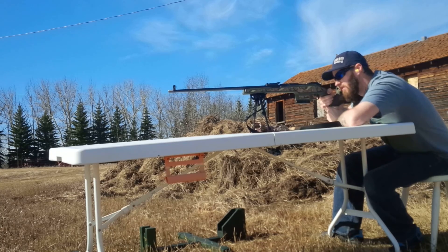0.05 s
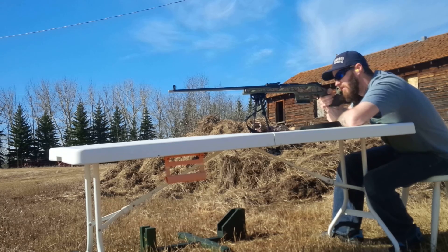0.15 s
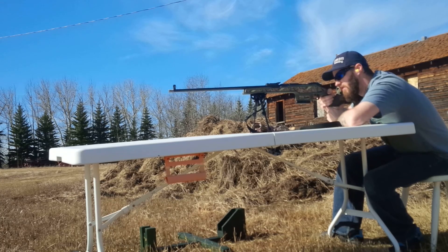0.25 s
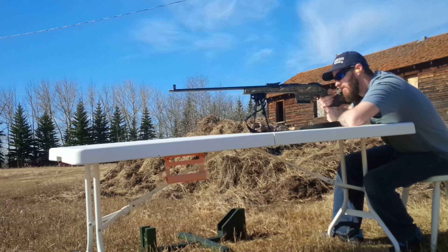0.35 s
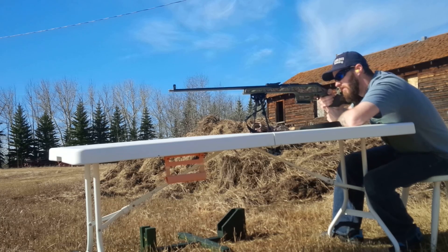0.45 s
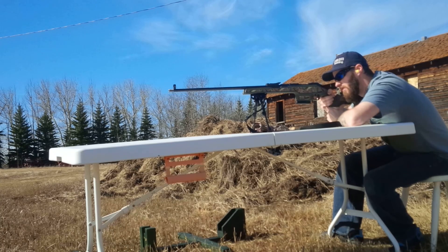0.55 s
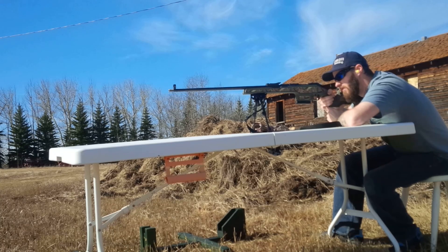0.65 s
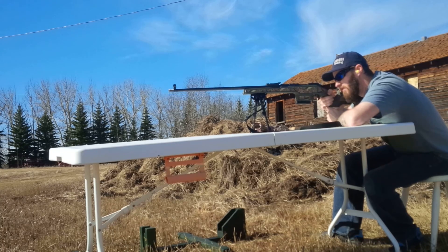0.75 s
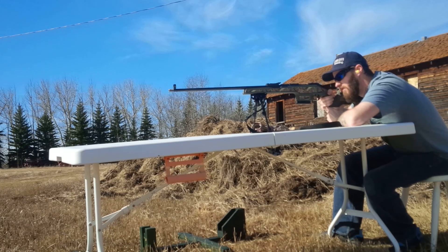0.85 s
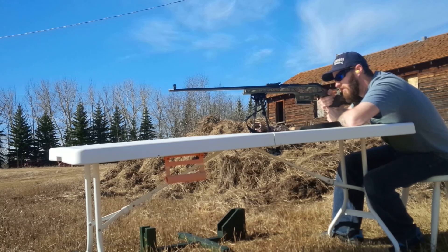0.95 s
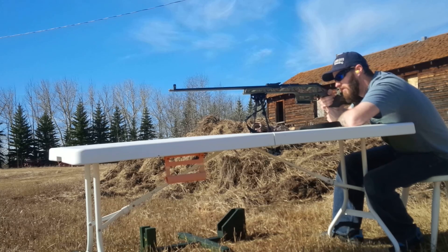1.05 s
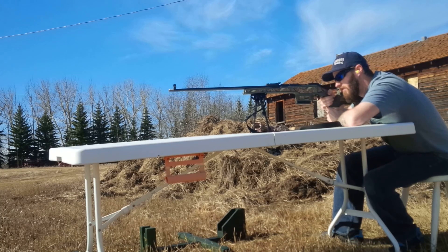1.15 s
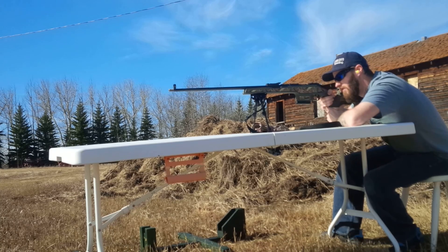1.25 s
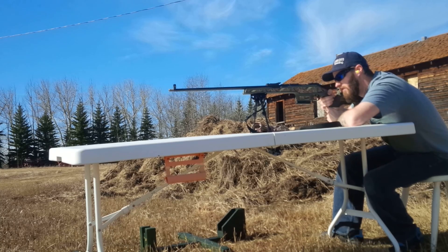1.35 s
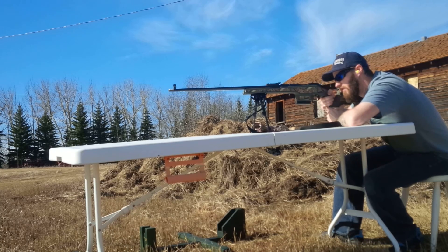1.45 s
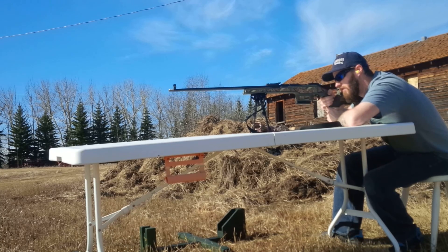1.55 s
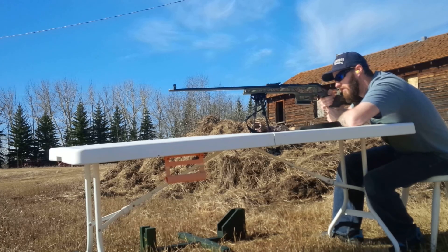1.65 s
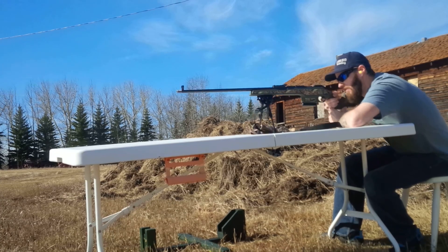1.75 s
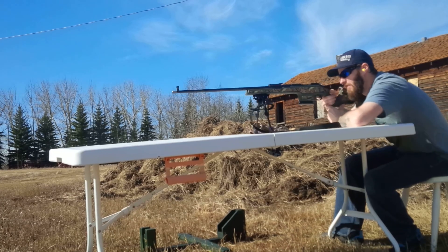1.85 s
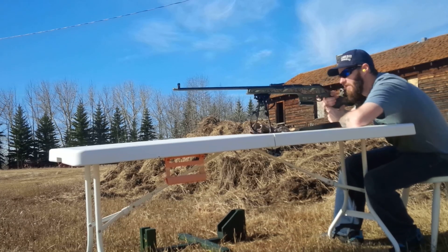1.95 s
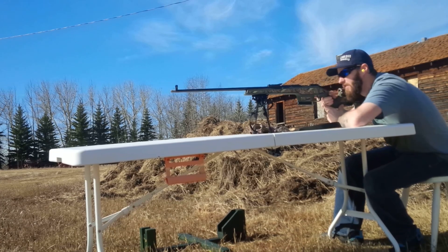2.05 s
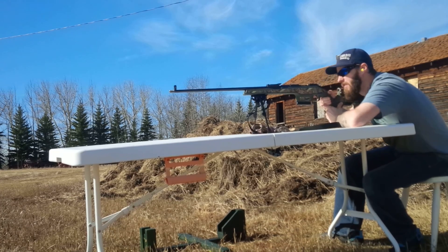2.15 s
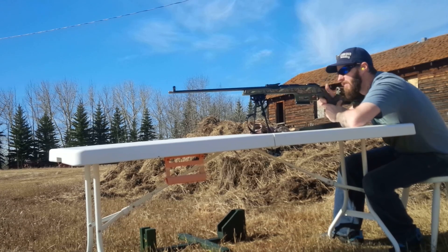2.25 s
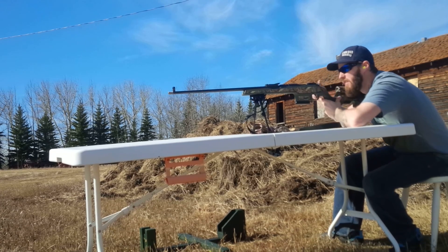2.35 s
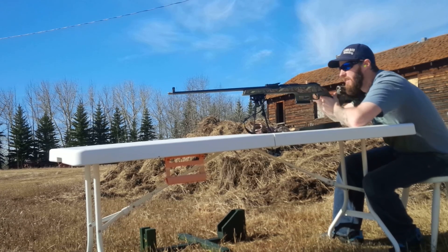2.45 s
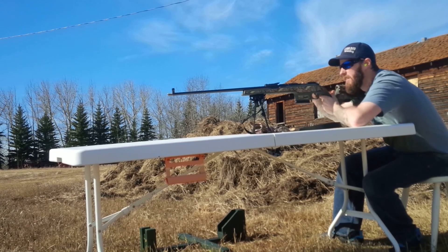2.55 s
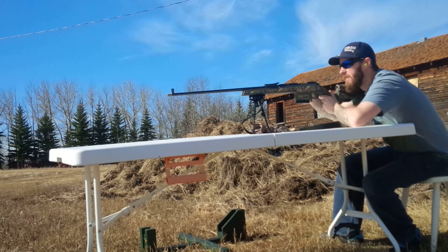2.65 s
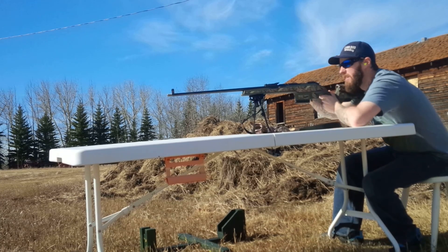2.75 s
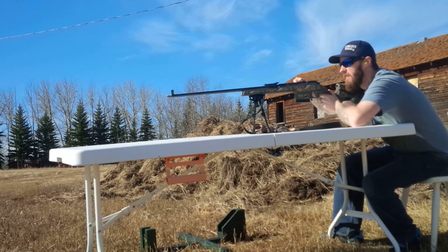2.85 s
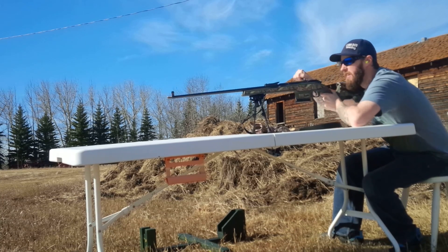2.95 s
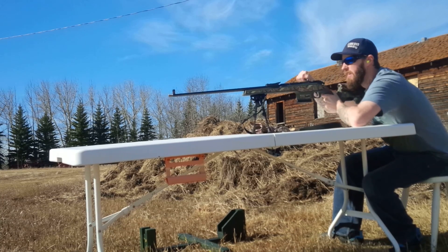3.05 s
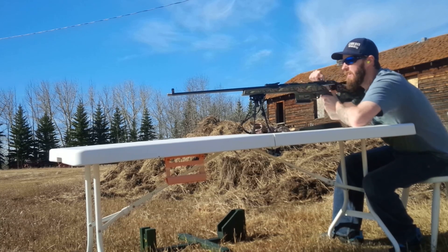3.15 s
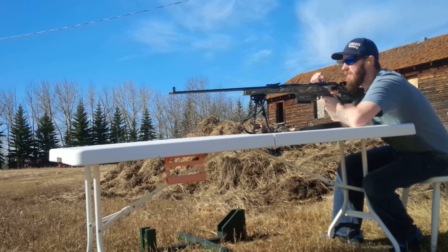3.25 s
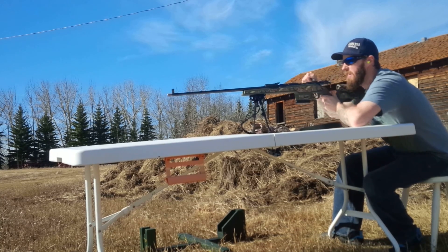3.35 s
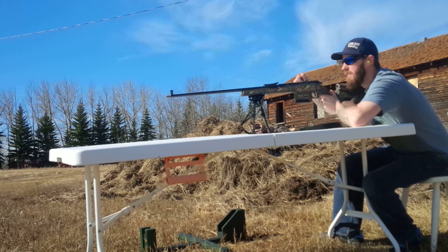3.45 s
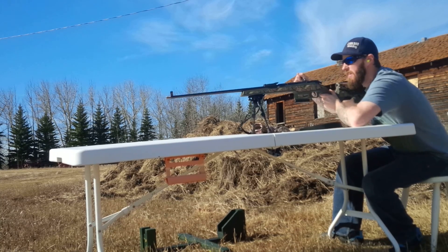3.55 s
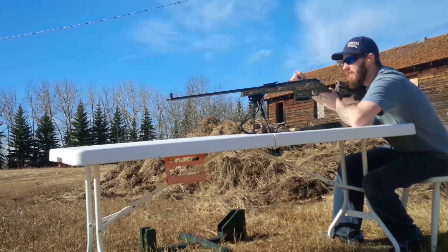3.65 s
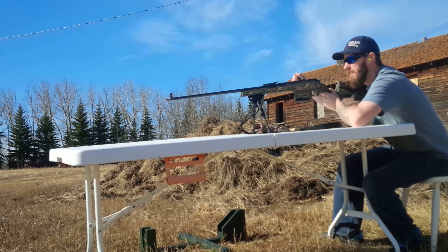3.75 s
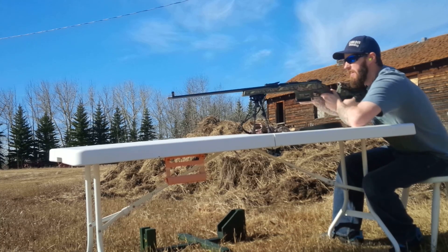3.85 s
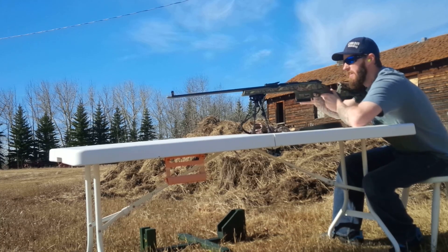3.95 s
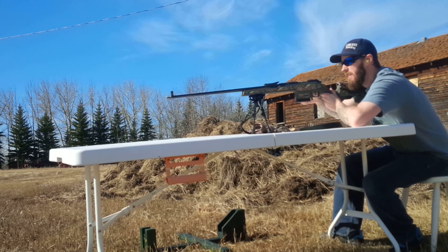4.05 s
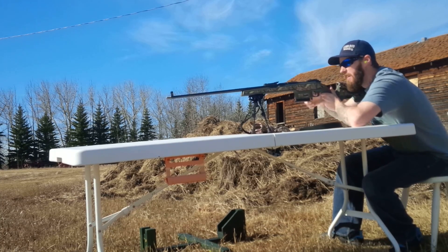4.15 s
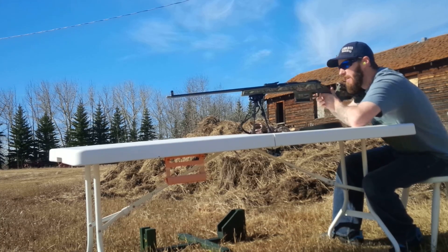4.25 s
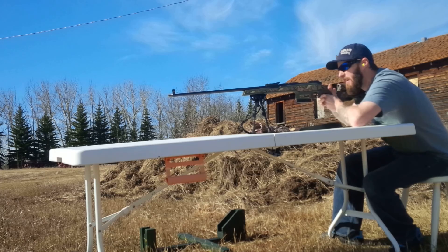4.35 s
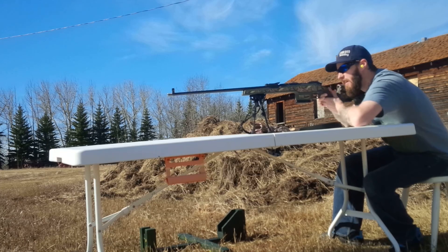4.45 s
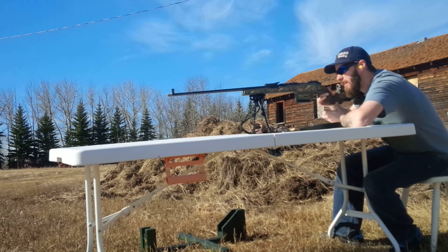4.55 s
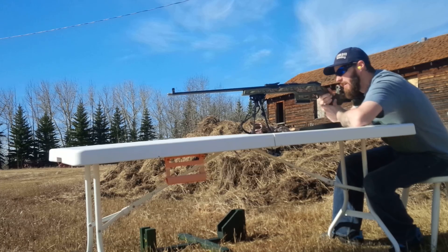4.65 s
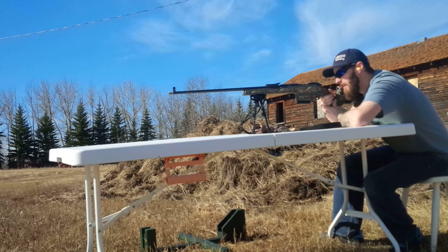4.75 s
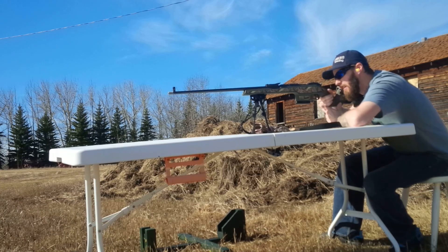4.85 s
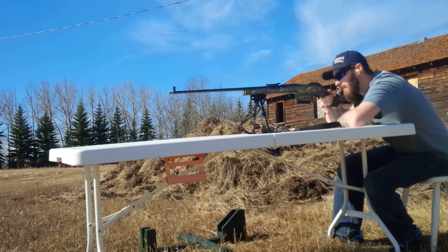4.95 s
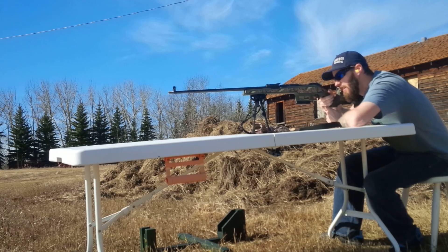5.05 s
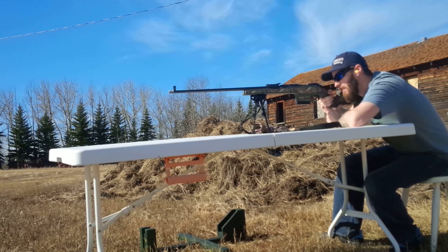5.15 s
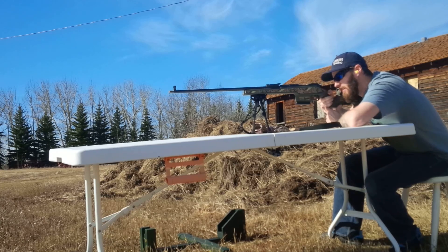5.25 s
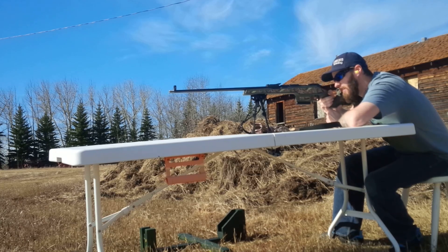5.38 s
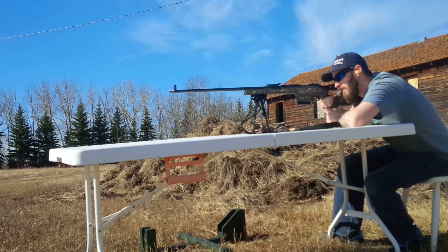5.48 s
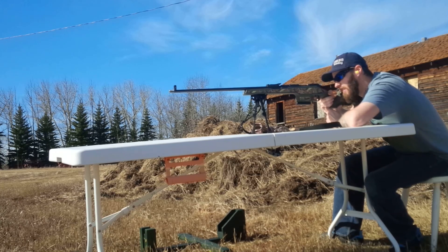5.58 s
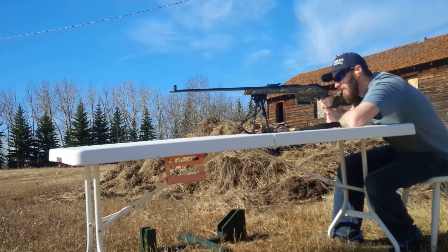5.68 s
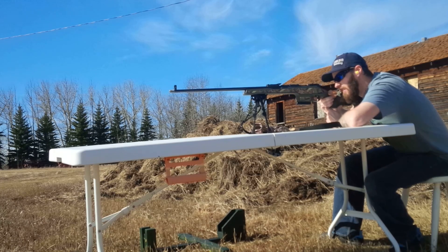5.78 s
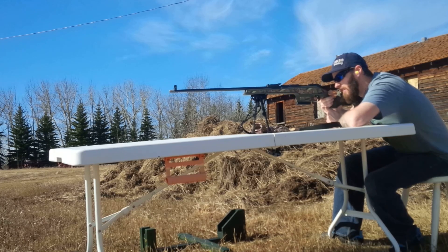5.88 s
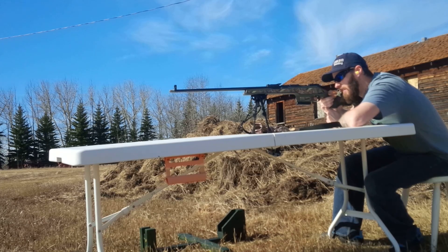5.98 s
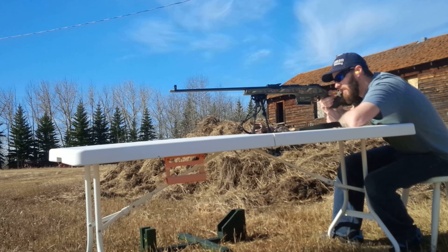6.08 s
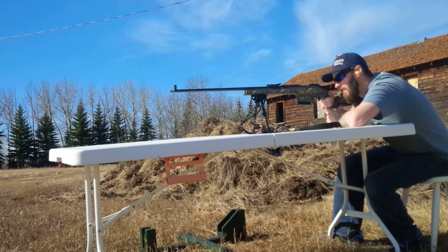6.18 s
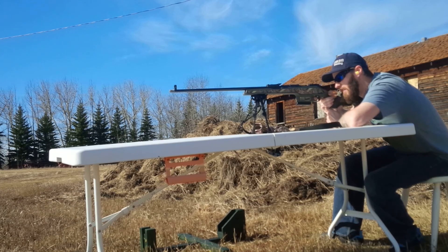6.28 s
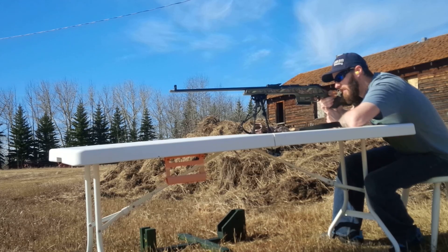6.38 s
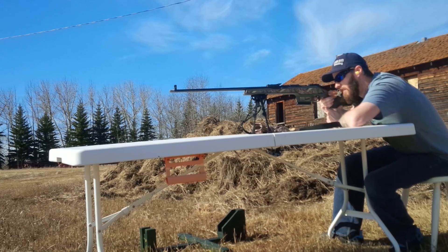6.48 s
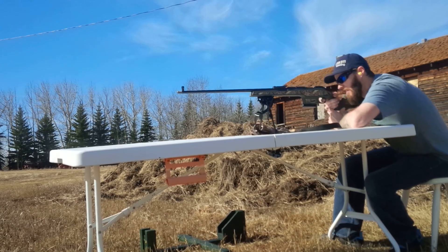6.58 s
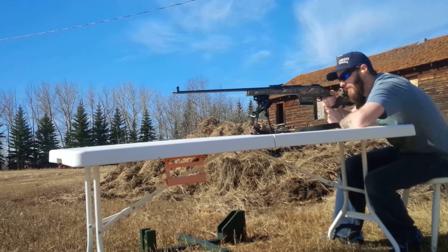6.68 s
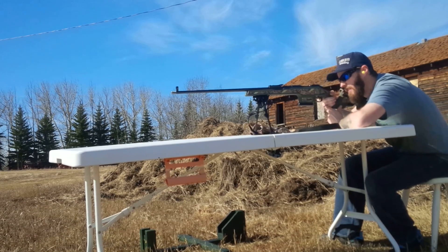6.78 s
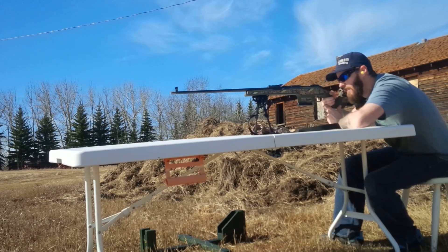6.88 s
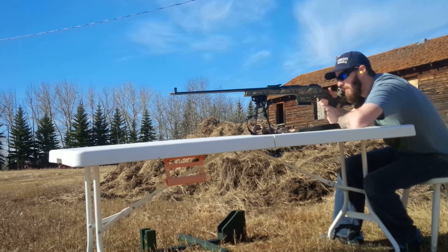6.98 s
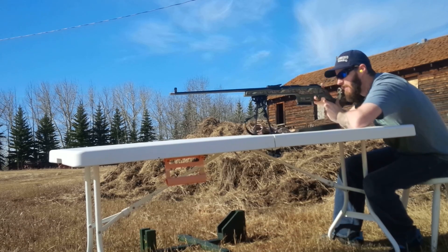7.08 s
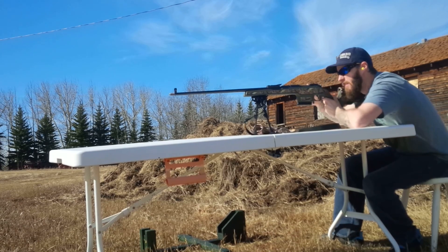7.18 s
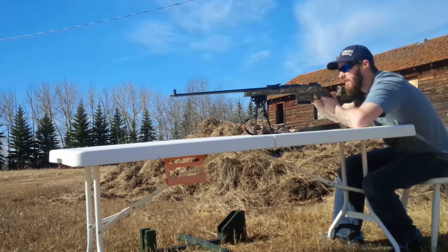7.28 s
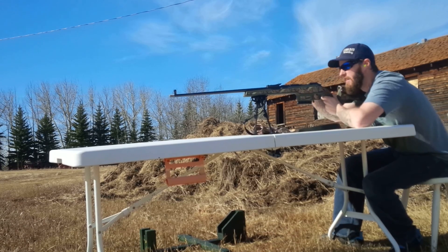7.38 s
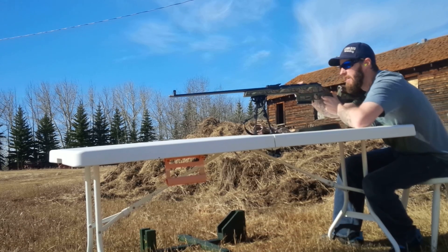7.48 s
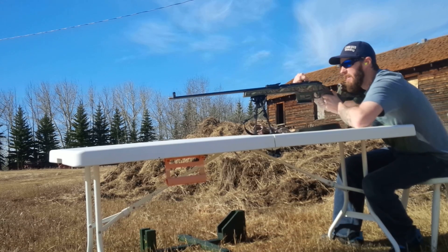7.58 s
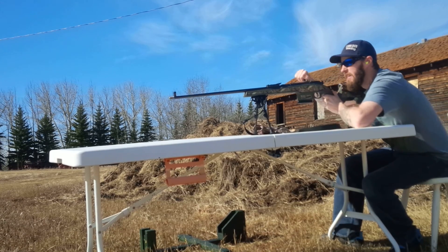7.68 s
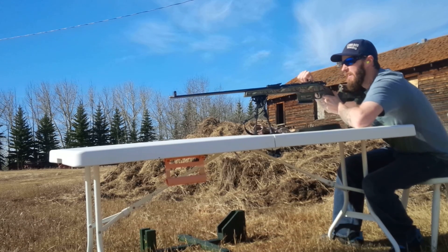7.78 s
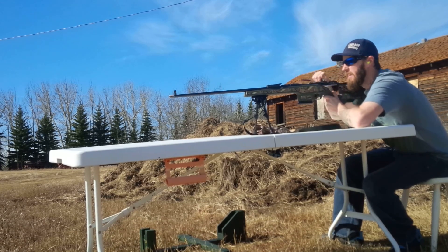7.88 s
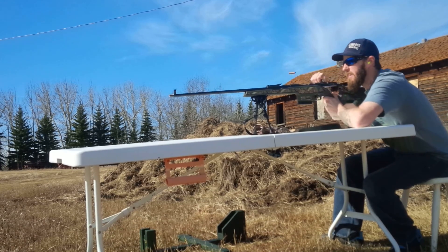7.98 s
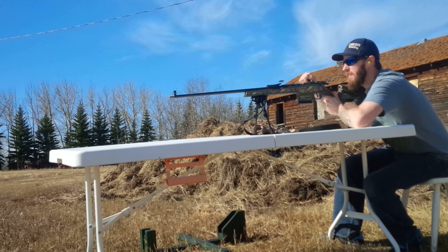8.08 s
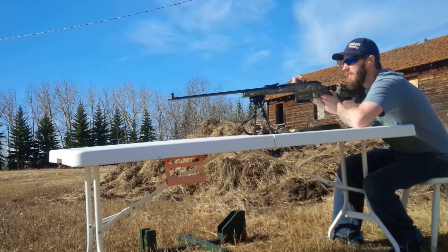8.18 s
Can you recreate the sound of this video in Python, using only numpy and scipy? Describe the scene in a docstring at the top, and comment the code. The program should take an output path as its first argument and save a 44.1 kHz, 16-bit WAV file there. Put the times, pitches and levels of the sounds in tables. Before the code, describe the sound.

In a quiet breezy field a rifle fires with a rolling echo, its bolt clacks through a cycle, then it fires and is worked again.

```python
"""Light wind and a far road lie over an open field: coloured noise with slow swells, and one car passing.
A rifle on a table a few steps from the microphone fires: a saturated noise blast and decaying ground wash.
Walls answer with slaps, and trees with a rolling tail of noise; amid it the bullet smacks down far downrange.
The bolt is lifted and drawn, the case pings out, and the bolt slides home: rough noise bursts ring steel.
The rifle fires once more, the same field answers, and the bolt is worked again."""
import sys
import numpy as np
from scipy import signal
from scipy.fft import irfft
from scipy.io import wavfile
from scipy.ndimage import uniform_filter1d

SR = 44100
rng = np.random.default_rng(int(sys.argv[2]) if len(sys.argv) > 2 else 0)


def put_to_file(sound):
    """Save the sound as 16-bit audio at rate SR, in the file named by the first command-line argument."""
    columns = np.atleast_2d(sound).T  # one column per channel
    safe = np.clip(columns, -1, 1)
    whole_steps = np.round(safe * 32767)
    wavfile.write(sys.argv[1], SR, whole_steps.astype(np.int16))


N = 362452

# Noise spectra. Each row: frequency in Hz, relative level in dB per Hz.
AIR_SPECTRUM = [(12, -31.5), (20, -10), (53, -6.5), (172, -11.5), (216, -10.5), (255, -15), (347, -14.5),
                (377, -19), (642, -19), (873, -14), (1610, -21), (1910, -25.5), (2460, -37), (13500, -52),
                (16000, -65)]  # still air over the field
ROAD_SPECTRUM = [(100, -26), (450, -14), (750, -5.5), (930, 1.5), (1100, -3.5), (1400, -7.5), (2000, -19.5),
                 (3500, -47), (16000, -70.5)]  # the far road
WIND_SPECTRUM = [(15, -4), (45, -0.5), (100, -10), (250, -35), (2000, -81)]  # moving air on the microphone
BLAST_SPECTRUM = [(30, -3), (120, -7), (400, 6), (900, 4), (2000, -4), (4500, -1), (8000, -11),
                  (16000, -12)]  # the muzzle, a few steps away
WASH_SPECTRUM = [(25, -4.5), (70, -3.5), (130, -5.5), (300, 1), (600, 1.5), (1100, -5.5), (2000, -11),
                 (4000, -15), (8000, -27), (15000, -23)]  # scatter from the ground near the muzzle
BOOM_SPECTRUM = [(25, -15), (70, -10.5), (110, -4.5), (160, 0), (270, -2.5), (340, -11), (450, -14.5),
                 (700, -24), (1100, -36), (2500, -60.5), (16000, -89.5)]  # low roll of the field
CRACK_SPECTRUM = [(100, -24.5), (350, -17.5), (700, -2), (1100, -2.5), (1500, -4.5), (2050, -2),
                  (2800, -2.5), (3700, -11), (5500, -15), (8000, -21.5), (12000, -21), (16000, -33.5)]  # slaps from walls and crackle from trunks
DISTANT_SPECTRUM = [(300, -26), (800, 1), (1500, 1), (2000, 0), (2350, 0.5), (2800, -2), (3500, -24),
                    (6000, -32), (16000, -71)]  # the narrow band returned by far tree lines
SMACK_SPECTRUM = [(200, -1.5), (1000, 2), (2000, 2.5), (3300, 1.5), (5000, -2), (7000, -13.5),
                  (10000, -25.5), (15000, -53)]  # the bullet landing far downrange
STEEL_SPECTRUM = [(60, -23.5), (250, -21.5), (600, -1.5), (1400, -1.5), (2200, 0), (3500, -2), (5500, -3),
                  (6700, -8), (9500, -12.5), (12000, -6.5), (14500, -16.5), (16000, -19.5)]  # steel parts in rough contact
LIGHT_RUB_SPECTRUM = [(200, -13.5), (800, 0), (2500, 2.5), (5500, -1.5), (7500, -13), (16000, -24)]  # a light touch, which leaves the top of the steel unexcited

# Gusts over the steady breeze. Each row: peak in seconds, spread in seconds, level in dB.
GUSTS = [(1.25, 0.27, -57), (2.8, .5, -57), (6.281, .15, -49), (8.047, 0.079, -39.5)]
BREEZE_DB = -54.5
# A far car over the hum of the road: closest at (s), time to pass (s), its level and the road's (dB).
CAR_S, CAR_PASS_S, CAR_DB, ROAD_DB = 5.75, .45, -52.5, -65.5

# The shots. Each row: start in seconds, level in dB, how fast the echoes of the shot lose treble
# in dB per kHz per s.
SHOTS = [(1.767, 0.5, 5), (6.6006, -0.5, 6.5)]
TREBLE_KNEE_HZ = 1620  # the echoes lose only what lies above this
# Ring time of the ground wash near the muzzle. Each row: frequency in Hz, t60 in seconds.
WASH_T60 = [(40, 2.2), (200, .65), (450, 0.78), (800, 0.46), (1300, 0.33), (3000, .42), (8000, 0.78),
            (15000, 0.37)]
# Walls that throw each shot back. Each row: delay in seconds, boom level in dB, boom pitch in Hz,
# crack level in dB, lag of the right port in ms.
WALLS = [(0.0185, -10, 221, -13, .08), (.027, -14, 442, -20.5, .1), (.093, -7, 285, -11.5, -.38),
         (.1, -10, 676, -20.5, -0.31), (.18, -18, 253, -18.5, 0.43), (.219, -4, 195, -9, .4),
         (.232, -4.5, 261, -16.5, .46), (.262, -31, 250, -12.5, .36), (.275, -3, 263, -15, -.3),
         (.286, -25, 298, -19.5, 0.41), (0.471, -16, 210, -26.5, 0.16)]
# Broad scatterers, from the farmyard out to the tree line. Each row: delay in seconds, spread in seconds,
# boom level in dB, crackle level in dB.
THICKETS = [(.15, .06, -16, -51), (0.225, 0.0262, -18, -23), (.3, 0.0397, -23, -31),
            (.52, .055, -30, -24.5), (.6, 0.058, -35, -28.5)]
# Returns from the far tree lines. Each row: delay in seconds, level in dB, spread in seconds.
TREE_LINES = [(.53, -30, 0.017), (0.607, -28.5, 0.038), (.7, -47, .03), (.84, -48, 0.13)]
# Under them the whole field rolls: level (dB), build-up (s), fall (dB per s).
RUMBLE_DB, RUMBLE_RISE_S, RUMBLE_DB_PER_S = -21, .12, 31
CRACKLE_DB, CRACKLE_RISE_S, CRACKLE_DB_PER_S = -25, 0.18, 27.5

# The bullet lands far downrange. Each row: start in seconds, crack level in dB, tilt in dB per octave,
# thud level in dB, level of the spray of debris in dB.
IMPACTS = [(2.1592, -10, 1.5, -17.5, -36), (6.993, -21, 4.5, -3.5, -61)]
THUD_HZ, THUD_LATE_S, IMPACT_LAG_MS = 221, .0084, 0.275
# The debris rains down after the hit: its peak and its spread (s).
SPRAY_LATE_S, SPRAY_SPREAD_S = 0.061, 0.073

# Single blows as the handle is gripped, lifted, run home and locked. Each row: strike in seconds,
# level in dB, decay in seconds, receiver ring in dB relative to the blow.
CLACKS = [(2.86, -46.5, .005, -3), (2.9405, -35.5, 0.0059, -2.5), (3.0314, -10.5, 0.0031, -4.5),
          (3.313, -40.5, .004, -6), (3.4935, -20, 0.0031, -9.5), (3.707, -47.5, 0.0042, 3),
          (3.7417, -11, 0.0027, -4), (3.853, -34.5, 0.0033, 0), (3.9028, -21.5, 0.0052, -9),
          (3.931, -23, 0.0072, -8), (7.6094, -34, 0.0053, -3), (7.7112, -16, 0.004, -6),
          (8.0185, -36, 0.002, -5), (8.2093, -4, 0.0038, -7)]
# Harder blows are brighter: level with the plain steel colour (dB), tilt (dB per octave) for each dB
# above it, and the most tilt (dB per octave).
PLAIN_DB, TILT_PER_DB, TOP_TILT_DB = -21.5, 0.31, 1.34
# A soft swell of noise leads into and out of each blow: level relative to it, decay either side.
SOFT_EDGE_DB, SOFT_EDGE_S = -19, .004
# Ringing modes. Each row: frequency in Hz, relative level in dB, t60 in seconds.
RECEIVER_MODES = [(1362, -2, 0.045), (2013, -7, .018), (2370, -8.5, 0.02), (2940, 0.5, 0.023),
                  (3880, 2, 0.01), (4640, -11.5, .02), (5335, 1.5, .018), (7750, -5.5, 0.03),
                  (10900, -13, 0.034), (11800, -8, .012)]  # t60 before the hand damps the steel
STOCK_MODES = [(259, 0, 0.24), (365, -10, .08)]  # t60 before the grip damps the stock
CASE_MODES = [(9775, 0, .13), (13700, -4, .14)]  # the spent case, ringing freely
# The bolt is drawn back. Each row: start in seconds, time it hits its stop in seconds, effort in dB.
DRAWS = [(3.1198, 3.258, -0.5), (7.852, 7.9557, 0.5)]
# Catches passed on every draw, from unseating the case to the stop. Each row: share of the stroke,
# level in dB before effort, decay in seconds, stock thump in dB relative to the blow.
CATCHES = [(0, -28.5, 0.0039, -6.5), (0.411, -21.5, .0045, -26), (0.696, -24, .0052, -28),
           (.869, -12.5, .0075, -35.5), (0.999, -8, .0055, -22.5)]
CASE_DB, CASE_PITCHES = -30, (1.0, .979)  # level before effort; pitch ratio for each draw
# The bolt is pushed forward. Each row: start in seconds, end in seconds, level in dB,
# easing in dB per s once the round is out of the magazine.
PUSHES = [(3.373, 3.5, -29.5, 200), (8.087, 8.206, -27.5, 43)]

EDGE_HZ = 16000  # top of the recorded band


def amp(db):
    """Decibels to gain."""
    return 10 ** (np.asarray(db) / 20)


def evened(x):
    """Scales to rms 1."""
    return x / np.sqrt(np.mean(x ** 2) + 1e-20)


def read(points, hz):
    """Reads a table on a log-frequency axis."""
    f, value = np.transpose(points)
    return np.interp(np.log(hz + 1), np.log(f + 1), value)


def clock(seconds):
    """Sample times from zero."""
    return np.arange(int(seconds * SR)) / SR


def add(mix, s, sound):
    """Mixes a sound in at time s."""
    part = mix[:, round(s * SR):][:, :sound.shape[-1]]
    part += sound[..., :part.shape[1]]


def swell(t, middle_s, spread_s):
    """A smooth rise and fall of height 1."""
    return np.exp(-((t - middle_s) / spread_s) ** 2)


def ripple(hz, depth_db, spacing_hz=110):
    """Paths of unequal length comb the sound into irregular peaks and dips."""
    knots = np.clip(rng.standard_normal(400), -2, 2)
    return depth_db * np.interp(hz / spacing_hz, np.arange(len(knots)), knots) * np.minimum(hz / 700, 1)


def noise(spectrum, size, lag_ms=0, alike_hz=3000, tilt_db=0, ripple_db=0):
    """Coloured noise at two ports: the right one hears it late, and less alike towards the treble."""
    hz = np.fft.rfftfreq(size, 1 / SR)
    left, other = np.exp(2j * np.pi * rng.random((2, len(hz))))
    alike = 1 / (1 + hz / alike_hz)
    right = alike * left + np.sqrt(1 - alike ** 2) * other
    right = right * np.exp(-2j * np.pi * hz * lag_ms / 10 ** 3)
    octaves = np.log2(np.maximum(hz, 500) / 500)
    colour = amp(read(spectrum, hz) + tilt_db * octaves + ripple(hz, ripple_db))
    return evened(irfft(np.array([left, right]) * colour, size))


def grain(size, depth_db, hz):
    """A random gain of rms 1 that changes hz times a second."""
    knots = np.clip(rng.standard_normal(N // 10), -2, 2)
    wander = np.interp(np.arange(size) * hz / SR, np.arange(len(knots)), knots)
    return evened(amp(depth_db * wander))


def fade(x, db_per_s, patchy_db=3):
    """Lets each frequency die at its own rate; crossing reflections cancel and add in patches."""
    hz, t, z = signal.stft(x, SR, nperseg=256)
    patches = uniform_filter1d(rng.standard_normal(z.shape[1:]), size=2, axis=0)
    patches = evened(uniform_filter1d(patches, size=7, axis=1))
    depth_db = patchy_db * np.minimum(hz / 1000, 1)
    gain = amp(depth_db[:, None] * np.clip(patches, -2, 2) - db_per_s(hz)[:, None] * t)
    return signal.istft(z * gain, SR, nperseg=256)[1][:, :x.shape[1]]


def burst(sound, force):
    """Shapes a rough sound in time; the force alone sets its energy."""
    return evened(sound * force) * np.sqrt(np.mean(force ** 2))


def ring(modes, t, pitch=1, vary_db=0):
    """Dying modes; their strengths vary at random from blow to blow."""
    hz, db, t60 = np.transpose(modes)[..., None]
    chance, phase, spread = rng.standard_normal((3, len(modes), 1))
    size = amp(db + vary_db * chance - 60 * t / t60)
    angle = 2 * np.pi * (hz * pitch * t + phase)
    skew = spread * np.minimum(hz / 6000, .7)  # high modes reach the two ports out of step
    return np.array([(size * np.sin(angle + side * skew)).sum(0) for side in (-1, 1)])


def outdoors(air_db=-53.0):
    """Still air, a far road off to the left, and lumpy wind at each port."""
    t = np.arange(N) / SR
    air = amp(air_db) * noise(AIR_SPECTRUM, N, lag_ms=.33, alike_hz=1800) * grain(N, depth_db=0.5, hz=6.2)
    car = amp(CAR_DB) / np.hypot(1, (t - CAR_S) / CAR_PASS_S)
    traffic = np.hypot(amp(ROAD_DB), car)
    road = traffic * noise(ROAD_SPECTRUM, N, lag_ms=0.29, alike_hz=12000) * grain(N, depth_db=0.64, hz=8)
    gust_power = sum((amp(db) * swell(t, s, spread_s)) ** 2 for s, spread_s, db in GUSTS)
    wind = np.sqrt(amp(BREEZE_DB) ** 2 + gust_power)
    lumps = noise(WIND_SPECTRUM, N, alike_hz=25) * grain(N, depth_db=1.5, hz=3)
    return air + road + wind * lumps


def lead_in(lead_s, rush_db=-13, rush_s=0.0061):
    """A brief rush of noise grows exponentially up to the shot."""
    t = clock(lead_s)
    return amp(rush_db) * np.exp((t - lead_s) / rush_s) * noise(BLAST_SPECTRUM, len(t))


def ground_wash(t, wash_rise_s=0.014):
    """The ground near the muzzle scatters the blast; each band dies at its own rate."""
    wash = noise(WASH_SPECTRUM, len(t), alike_hz=1800, ripple_db=4.0)
    wash = fade(wash, lambda hz: 60 / read(WASH_T60, hz), patchy_db=4.5)
    rise = np.minimum(.3 + (t / wash_rise_s) ** 2, 1)
    return wash * grain(len(t), depth_db=-0.5, hz=400) * rise


def muzzle(drive_db=3, hold_s=.0042, release_s=.0012, ceiling_db=-4.5, wash_db=-12.0,
           push_db=-17, push_s=.006):
    """The blast slams the microphone from rail to rail; then the ground nearby scatters it."""
    t = clock(0.99)
    blast = amp(drive_db) * noise(BLAST_SPECTRUM, len(t), lag_ms=.2, alike_hz=1200)
    blast = blast * np.exp(-np.maximum(t - hold_s, 0) / release_s)
    overloaded = amp(ceiling_db) * np.tanh(2 * blast)
    push = amp(push_db) * (1 - t / push_s) * np.exp(-t / push_s)  # overpressure, then suction
    return overloaded + push + amp(wash_db) * ground_wash(t)


def stirred_air(buffet_db=-40, buffet_s=.15):
    """Air stirred by the shot buffets each port and dies away."""
    t = clock(.6)
    return amp(buffet_db) * np.exp(-t / buffet_s) * noise(WIND_SPECTRUM, len(t), alike_hz=15)


def slap(row, spectrum, swell_s, decay_s, tilt_db=0, late_s=0):
    """One arrival: a low boom of a few cycles and a ragged crack."""
    boom_db, boom_hz, crack_db, lag_ms = row
    t = clock(.15)
    port_lag_s = np.array([[0], [lag_ms / 10 ** 3]])
    age = np.maximum(t - late_s - port_lag_s, 0)
    boom = age / swell_s * np.exp(1 - age / swell_s) * np.sin(2 * np.pi * boom_hz * age)
    crack = noise(spectrum, len(t), lag_ms, alike_hz=14080, tilt_db=tilt_db, ripple_db=3.5)
    crack = crack * grain(len(t), depth_db=3.0, hz=504)
    force = np.exp(-t / decay_s) * (1 - np.exp(-t / .0008))
    return amp(boom_db) * boom + amp(crack_db) * burst(crack, force)


def roll(t, db, rise_s, db_per_s):
    """Scatter builds up as the sound spreads, then dies away."""
    return amp(db - db_per_s * t) * (1 - swell(t, 0, rise_s))


def field(near_s=.03, near_tilt_db=4, far_tilt_db=.3, hiss_db=-46, hiss_s=0.37):
    """The shot rolls round the field: slaps from walls, rumble and crackle from countless trunks."""
    t = clock(2)
    low = roll(t, RUMBLE_DB, RUMBLE_RISE_S, RUMBLE_DB_PER_S)
    high = roll(t, CRACKLE_DB, CRACKLE_RISE_S, CRACKLE_DB_PER_S)
    for s, spread_s, boom_db, crackle_db in THICKETS:
        low = np.hypot(low, amp(boom_db) * swell(t, s, spread_s))
        high = np.hypot(high, amp(crackle_db) * swell(t, s, spread_s))
    boom = low * noise(BOOM_SPECTRUM, len(t), lag_ms=0.057, alike_hz=4000)
    crackle = high * noise(CRACK_SPECTRUM, len(t), lag_ms=.32, alike_hz=5500, ripple_db=2.5)
    far_level = sum(amp(db) * swell(t, s, spread_s) for s, db, spread_s in TREE_LINES)
    distant = far_level * noise(DISTANT_SPECTRUM, len(t), lag_ms=0.41, alike_hz=5500)
    trunks = grain(len(t), depth_db=3.0, hz=425.5) * grain(len(t), depth_db=0.3, hz=60)
    grass_spectrum = [(1000, -31.5), (5000, 1), (13000, -1.5), (16000, -8.5)]  # Hz, dB per Hz
    grass = amp(hiss_db) * np.exp(-t / hiss_s) * noise(grass_spectrum, len(t))
    out = boom + (crackle + distant) * trunks + grass
    for s, *row in WALLS:
        tilt_db = far_tilt_db + near_tilt_db * np.exp(-s / near_s)  # the nearest walls are the brightest
        add(out, s, slap(row, CRACK_SPECTRUM, swell_s=0.003, decay_s=.012, tilt_db=tilt_db))
    return out


def impact(crack_db, tilt_db, thud_db, spray_db):
    """The bullet lands with a crack and a later thud, and throws up a pattering spray of debris."""
    t = clock(.6)
    out = noise(SMACK_SPECTRUM, len(t), IMPACT_LAG_MS, alike_hz=9000, tilt_db=7.0)
    out = out * grain(len(t), depth_db=-0.5, hz=625)
    out = amp(spray_db) * out * swell(t, SPRAY_LATE_S, SPRAY_SPREAD_S)
    hit = (thud_db, THUD_HZ, crack_db, IMPACT_LAG_MS)
    add(out, 0, slap(hit, SMACK_SPECTRUM, swell_s=.0015, decay_s=0.0058, tilt_db=tilt_db, late_s=THUD_LATE_S))
    return out


def rifle():
    """Both shots share one set of field echoes, each dulled at its own rate; the bullets land."""
    out, lead_s = np.zeros((2, N)), .025
    echoes = field()
    rush = lead_in(lead_s)
    for s, db, dulling_db in SHOTS:
        def treble_loss(hz):
            """How fast the echoes of this shot lose treble, in dB per second."""
            return dulling_db * np.maximum(hz - TREBLE_KNEE_HZ, 0) / 10 ** 3

        add(out, s - lead_s, amp(db) * rush)
        add(out, s, amp(db) * muzzle())
        add(out, s, amp(db) * fade(echoes, treble_loss, patchy_db=4.0))
        add(out, s, amp(db) * stirred_air())
    for s, *landing in IMPACTS:
        add(out, s, impact(*landing))
    return out


def receiver(contact, db):
    """Rattling contact plus the short steel resonances that it excites, damped by the hand."""
    t = clock(.04)
    modes = ring(RECEIVER_MODES, t, pitch=rng.uniform(.97, 1.03), vary_db=1.5) * np.exp(-t / .012)
    modes = modes / np.linalg.norm(modes[0])
    return contact + amp(db) * signal.fftconvolve(contact, modes, axes=1)[:, :contact.shape[1]]


def stock_thump(t, grip_s=0.054):
    """The stock's low modes swell in and are damped by the grip."""
    modes = ring(STOCK_MODES, t, pitch=rng.uniform(.94, 1.1), vary_db=2.5)
    return modes * (1 - np.exp(-t / 0.004)) * np.exp(-t / grip_s)


def clack(s, db, decay_s, thump_db, ring_db, rise_s=0.00076, stock_db=-1):
    """A part strikes within a soft swell of noise, and the stock thumps. Gives (start, sound)."""
    t, lead_s = clock(.25), .025
    age = t - lead_s
    blow = np.exp(-np.maximum(age, 0) / decay_s) * (1 + np.tanh(age / rise_s - 1)) / 2
    soft_edge = amp(SOFT_EDGE_DB) * np.exp(-abs(age) / SOFT_EDGE_S)
    tilt_db = min(TILT_PER_DB * (db - PLAIN_DB), TOP_TILT_DB)
    contact = noise(STEEL_SPECTRUM, len(t), lag_ms=0.034, alike_hz=3970, tilt_db=tilt_db, ripple_db=2.0)
    contact = contact * grain(len(t), depth_db=4, hz=1250.4)
    sound = receiver(burst(contact, blow + soft_edge), ring_db)
    add(sound, lead_s, amp(thump_db + stock_db) * stock_thump(t))
    return s - lead_s, amp(db) * sound


def clacks():
    """The blows of the handle and the catches of each draw; at the stop the spent case flicks out and pings."""
    out = np.zeros((2, N))
    for s, db, decay_s, ring_db in CLACKS:
        add(out, *clack(s, db, decay_s, thump_db=-28, ring_db=ring_db))
    for (start, stop, effort_db), pitch in zip(DRAWS, CASE_PITCHES):
        for share, db, decay_s, thump_db in CATCHES:
            strike_s = start + share * (stop - start)
            add(out, *clack(strike_s, db + effort_db, decay_s, thump_db, ring_db=-10))
        add(out, stop, amp(CASE_DB + effort_db) * ring(CASE_MODES, clock(.25), pitch))
    return out


def scrape(length_s, db, climb_db, peak_share, release_s, ease_db_per_s=0, bright_db=-29, ring_db=-13):
    """The bolt gathers speed and scrapes in gritty slips, brighter the harder it is pushed."""
    t, peak_s = clock(.25), peak_share * length_s
    climb = climb_db * np.maximum(1 - t / peak_s, 0)
    ease = ease_db_per_s * np.maximum(t - peak_s, 0)
    push = amp(db - climb - ease) * (1 - np.exp(-t / 0.0056))
    push = push * np.exp(-np.maximum(t - length_s, 0) / release_s)
    hard = np.minimum(push / amp(bright_db), 1) ** 2  # share of power in the bright colour
    light = noise(LIGHT_RUB_SPECTRUM, len(t), lag_ms=0.034, alike_hz=5030)
    heavy = noise(STEEL_SPECTRUM, len(t), lag_ms=0.022, alike_hz=5000, tilt_db=0.3)
    slips = grain(len(t), depth_db=5.5, hz=700.4) * grain(len(t), depth_db=1.7, hz=121)
    contact = np.sqrt(1 - hard) * light + np.sqrt(hard) * heavy
    return receiver(push * slips * contact, ring_db)


def slides(draw_db=-34):
    """The bolt scrapes back in its raceway, louder for most of the stroke, and then forward again."""
    out = np.zeros((2, N))
    for start, stop, effort_db in DRAWS:
        back = scrape(stop - start, draw_db + effort_db, climb_db=21, peak_share=0.85, release_s=0.019)
        add(out, start, back)
    for start, end, db, ease_db_per_s in PUSHES:
        forward = scrape(end - start, db, climb_db=19, peak_share=0.61, release_s=0.011,
                         ease_db_per_s=ease_db_per_s)
        add(out, start, forward)
    return out


def yard(x, wet_db=-19, decay_s=0.014):
    """The table and the ground give the small sounds a short tail."""
    t = clock(.25)
    tail = rng.standard_normal((2, len(t))) * np.exp(-t / decay_s) * (t > .004)
    tail = tail / np.linalg.norm(tail[0])
    return x + amp(wet_db) * signal.fftconvolve(x, tail, axes=1)[:, :N]


def scene(bolt_left_db=0.05):
    """The open field, the rifle, and its bolt a touch to the left."""
    bolt = yard(clacks() + slides()) * amp([[bolt_left_db], [-bolt_left_db]])
    return outdoors() + rifle() + bolt


def record(dry):
    """Peaks are rounded off under full scale; then the band limit."""
    knee = .7
    inner = np.clip(dry, -knee, knee)
    clipped = inner + (1 - knee) * np.tanh((dry - inner) / (1 - knee))
    band = signal.firwin(255, EDGE_HZ, window=("kaiser", 8), fs=SR)
    return signal.oaconvolve(clipped, band[None], "same")


dry = scene()
out = record(dry)
put_to_file(out)
```